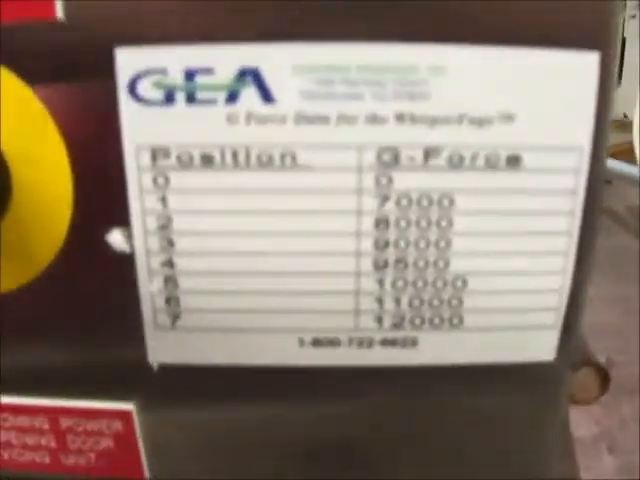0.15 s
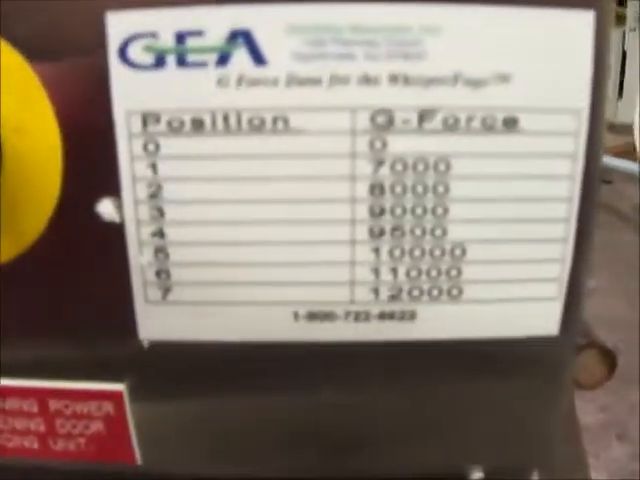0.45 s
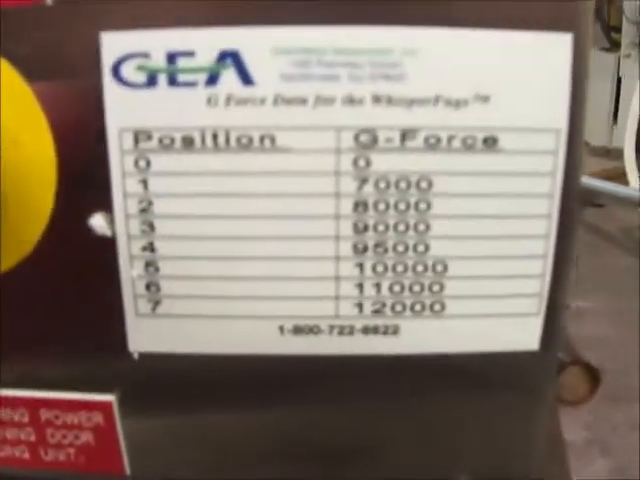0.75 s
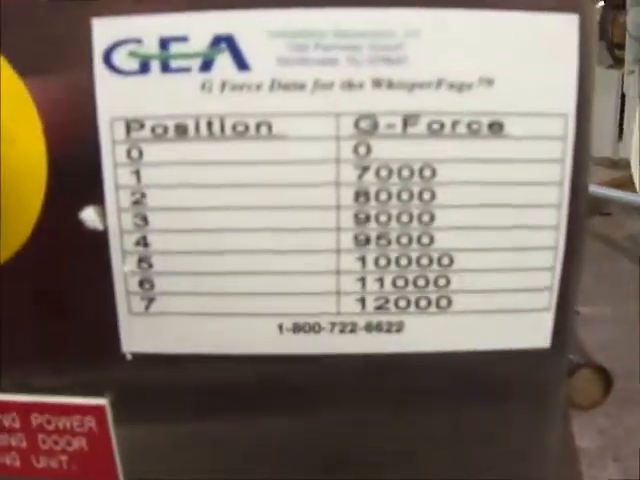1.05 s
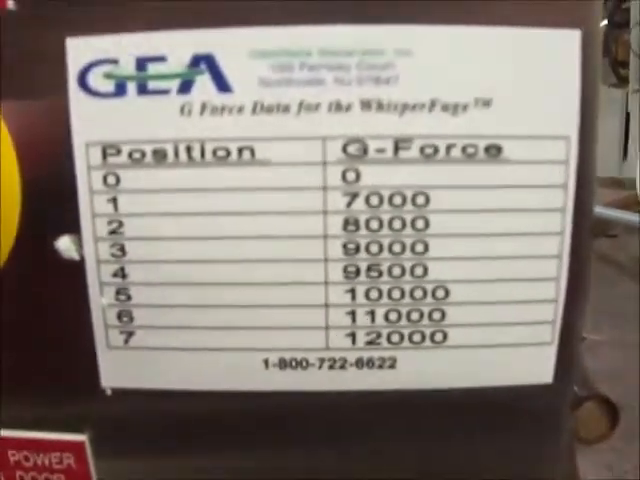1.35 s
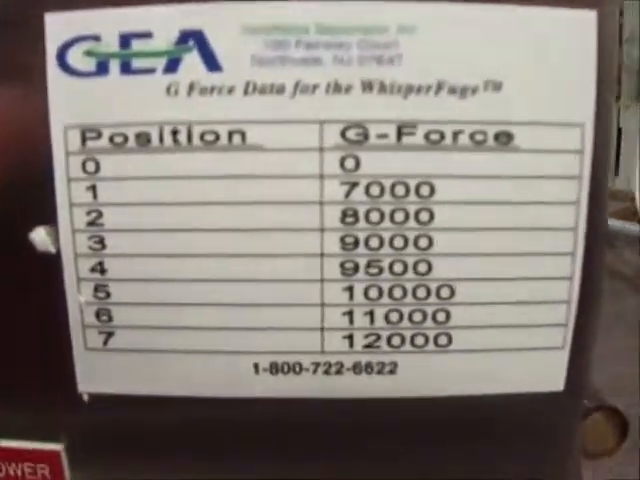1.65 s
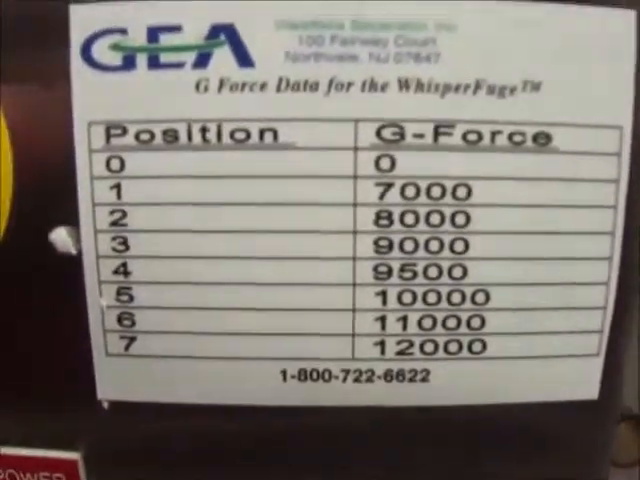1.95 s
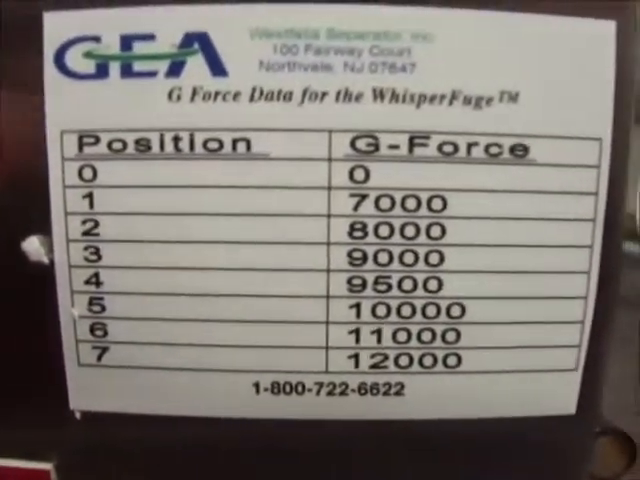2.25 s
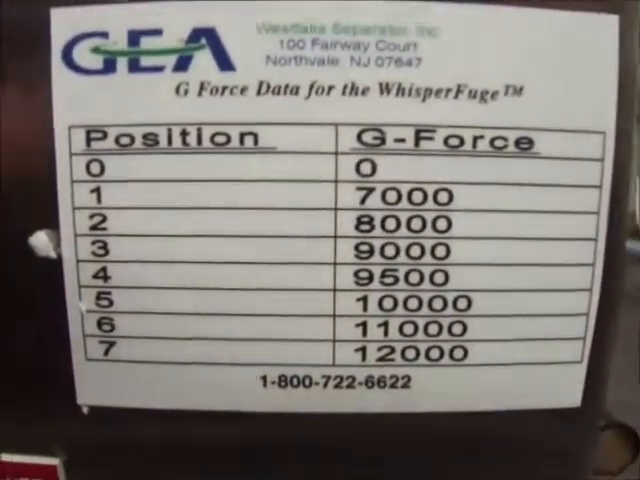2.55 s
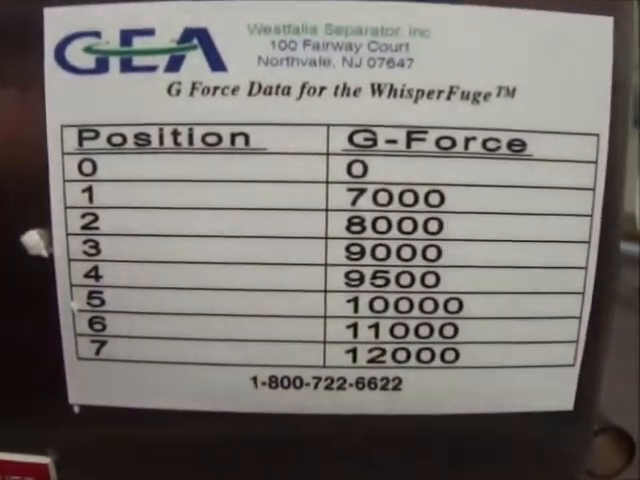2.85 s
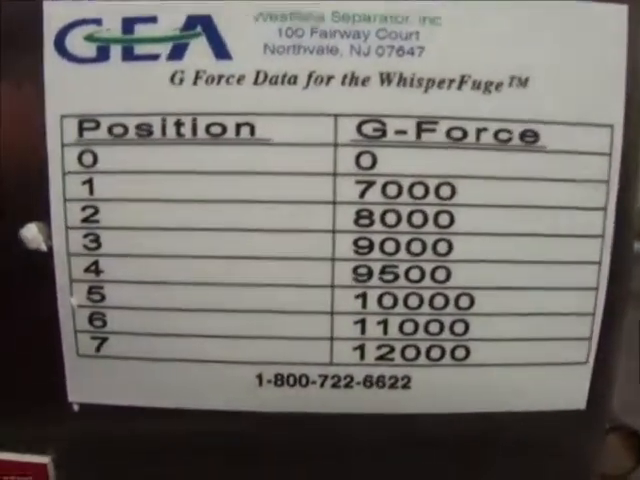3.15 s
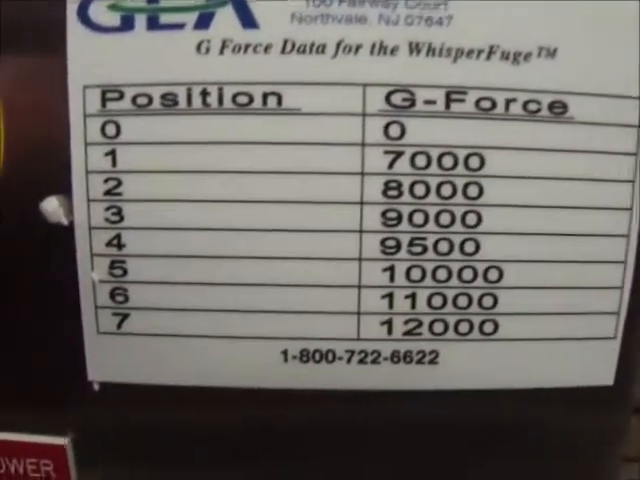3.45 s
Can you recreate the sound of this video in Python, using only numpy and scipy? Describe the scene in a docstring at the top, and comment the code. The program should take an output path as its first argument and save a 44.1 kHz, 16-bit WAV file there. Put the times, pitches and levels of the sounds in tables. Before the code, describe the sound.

Steady hum and hissing roar of an industrial centrifuge up close, with brief dull rattles.

```python
"""An industrial centrifuge runs at full speed in a factory hall, heard close to its control panel.
From the start the bowl hums at its rotation rate and the harmonics, amid drive tones and bearing whines;
churned air and liquid roar and hiss, throbbing 15 times a second, and strong throbs rattle the housing.
Brief steel rings colour the first 1.5 s, then a low drone swells. Rattles thin out after 2 s, a last
ring comes at 3 s, and the hum grows slightly as the microphone ends nearest the panel."""
import sys
import numpy as np
from scipy import signal
from scipy.fft import rfft, irfft
from scipy.io import wavfile

SR = 44100
rng = np.random.default_rng(int(sys.argv[2]) if len(sys.argv) > 2 else 0)


def file_out(sig):
    """Save sig as 16-bit WAV at sys.argv[1]."""
    # one column per channel
    cols = np.atleast_2d(sig).T
    # limit, then scale
    lim = np.clip(cols, -1, 1)
    pcm = np.round(lim * 32767).astype(np.int16)
    wavfile.write(sys.argv[1], SR, pcm)


N = 158760
t = np.arange(N) / SR


def undb(db):
    """Amplitude ratio of a level in decibels."""
    return 10 ** (np.asarray(db) / 20)


def filtered(x, gain):
    """Linear filtering: the spectrum is multiplied by gain(f)."""
    f = np.maximum(np.arange(N // 2 + 1) * SR / N, 1e-3)
    return irfft(rfft(x) * gain(f), N)


def fluctuation(rate_hz):
    """Low-pass Gaussian noise of zero mean and unit variance."""
    slow = filtered(rng.standard_normal(N), lambda f: 1 / (1 + (f / rate_hz) ** 4))
    return (slow - slow.mean()) / slow.std()


def tone(hz, db, waver, rate_hz):
    """Random amplitude and phase modulation of a sinusoid, at a given RMS level."""
    carrier = np.exp(2j * np.pi * (hz * t + rng.random()))
    sway = 1 + waver * (fluctuation(rate_hz) + 1j * fluctuation(rate_hz)) / np.sqrt(2)
    return undb(db) * np.sqrt(2 / (1 + waver ** 2)) * (sway * carrier).real


def resonance(hz, half_width_hz):
    """Response of one mode to random forcing, at unit RMS."""
    mode = filtered(rng.standard_normal(N), lambda f: 1 / (1 + ((f - hz) / half_width_hz) ** 2))
    return mode / mode.std()


# Envelope of the drone: t/s, level/dB
DRONE_LEVELS = [(0, -61), (.5, -57), (1, -74), (1.45, -49), (1.75, -49), (2.1, -59), (2.5, -52),
                (2.85, -64), (3.6, -54)]

def drone():
    """Slow amplitude modulation: a low tone of the drive comes and goes."""
    return tone(hz=83, db=0, waver=0.12, rate_hz=4) * undb(np.interp(t, *np.array(DRONE_LEVELS).T))


# Swells of metallic ringing: t/s, half-duration/s, f/Hz, half-width/Hz, level/dB
RING_SWELLS = [(.06, .12, 4030, 40, -35.5), (0.273, 0.081, 3890, 25, -35), (.70, 0.14, 2790, 80, -37),
               (.90, .11, 2800, 55, -37), (1.35, 0.22, 4055, 30, -39), (3.0, .09, 2870, 80, -39)]

def steel_ringing():
    """Lightly damped resonance: narrow, high modes of the steel swell and fade."""
    return sum(undb(db) * np.exp(-((t - at) / half_s) ** 2) * resonance(hz, width)
               for at, half_s, hz, width, db in RING_SWELLS)


# Whines of bearings and motor: f/Hz, relative level/dB
WHINE_LINES = [(1950, -45), (2927, -48), (3033, -44.5), (3095, -48), (3247, -51), (3492, -50), (3643, -49),
               (3708, -48.5), (3771, -47), (3886, -43), (4037, -45), (4059, -44), (4437, -50), (4588, -50),
               (6997, -48), (7095, -54), (7884, -53)]

def bearing_whine(gain_db=1):
    """Narrow-band fading: thin, high spectral lines waver independently in the hall."""
    return sum(tone(hz, db + gain_db, waver=0.4, rate_hz=3.1) for hz, db in WHINE_LINES)


# Modes of the housing: f/Hz, half-width/Hz, relative level/dB
HOUSING_MODES = [(464, 47, -9.5), (703, 44, -4.5), (870, 63, -0.5), (1016, 42, -11.5), (1320, 300, -6.5)]
# Strong throbs: t/s, relative level/dB
STRONG_THROBS = [(.078, -23), (.130, -19), (.194, -18), (.328, -24), (.392, -30), (.529, -21),
                 (.594, -24.5), (.864, -26), (.930, -21), (1.163, -24), (1.262, -34), (1.332, -19.5),
                 (1.594, -29), (1.731, -20), (1.922, -29), (2.532, -23), (2.832, -20), (2.932, -20),
                 (3.402, -27), (3.468, -19)]

def housing_rattle(gain_db=-3.5, rise_s=0.016, fall_s=0.015):
    """Forced vibration: each strong throb briefly excites the housing's modes in a dull rattle."""
    modes = sum(undb(db) * resonance(hz, width) for hz, width, db in HOUSING_MODES)
    force = sum(undb(db) * np.exp(-((t - at) / np.where(t < at, rise_s, fall_s)) ** 2)
                for at, db in STRONG_THROBS)
    return undb(gain_db) * force * modes / modes.std()


# Tones of drive and housing: f/Hz, level/dB
DRIVE_LINES = [(124, -59), (246, -47.5), (284, -51.5), (315, -52), (429, -47), (480, -42), (569, -46),
               (629, -49), (659, -51), (692, -41.5), (829, -44), (838, -43.5), (868, -45), (1030, -47),
               (1227, -48), (1241, -46.5), (1288, -47.5), (1327, -45.5), (1428, -48), (1439, -41),
               (1497, -48), (1607, -46.5), (1616, -40.5), (1637, -48.5), (1647, -47.5), (1672, -47)]

def drive_tones():
    """Beating: weak, wavering tones interfere where their frequencies lie close together."""
    return sum(tone(hz, db, waver=0.73, rate_hz=4) for hz, db in DRIVE_LINES)


# Roar and hiss, with the housing's broad resonances: f/Hz, spectral density level/dB
FLOW_SPECTRUM = [(25, -102), (60, -76), (100, -77.5), (155, -59.5), (200, -63), (330, -59.5), (455, -53.5),
                 (545, -60), (700, -55.5), (775, -55.5), (850, -51.5), (940, -60.5), (1030, -53),
                 (1100, -60), (1300, -54.5), (1550, -58.5), (1630, -59.5), (1760, -57.5), (1970, -58),
                 (2320, -62.5), (2800, -58.5), (3150, -63.5), (3400, -61.5), (4200, -63), (4900, -63.5),
                 (5900, -67.5), (9000, -69), (10200, -68), (11000, -69.5)]

def turbulence(body_gain, hiss_gain, throb_hz=14.97, shaft_hz=29.8):
    """Turbulent flow radiates broadband noise, coloured by the housing and modulated by rotation."""
    hz, db = np.array(FLOW_SPECTRUM).T
    white = rng.standard_normal(N) * np.sqrt(SR / 2)  # unit power per hertz
    noise = filtered(white, lambda f: undb(np.interp(np.log(f), np.log(hz), db)))
    body, up_to_churn, up_to_rush = (filtered(noise, lambda f: 1 / (1 + (f / edge_hz) ** 8))
                                     for edge_hz in (623, 2140, 5500))
    throb = 1 + 0.088 * np.cos(2 * np.pi * throb_hz * (t - 0.123))  # about half the shaft rate
    surge = undb(-2 + 0.35 * fluctuation(rate_hz=26))
    churn = (up_to_churn - body) * throb * surge
    rush = up_to_rush - up_to_churn
    hiss = (noise - up_to_rush) * undb(0.5) * hiss_gain
    shake = 1 + 0.047 * np.sin(2 * np.pi * (shaft_hz * t + rng.random()))  # once per motor shaft turn
    flicker = undb(0.36 * fluctuation(rate_hz=35))
    return body * body_gain + (churn + rush + hiss) * shake * flicker


# Harmonics of the bowl: order, level/dB, flutter depth
BOWL_HARMONICS = [(1, -29.5, 0.033), (2, -24.5, 0.024), (3, -36, 0.24), (4, -26.5, 0.11), (5, -38, 0.38),
                  (6, -39.5, 0.22), (7, -40, 0.37), (8, -36, 0.62), (9, -41, .3)]

def bowl_hum(rotation_hz=199.92):
    """Rotating unbalance: a periodic force gives exact harmonics, the upper ones fluttering most."""
    return sum(tone(order * rotation_hz, db, flutter, rate_hz=21.8)
               for order, db, flutter in BOWL_HARMONICS)


# Path of the microphone: t/s, distance from the panel/m
MICROPHONE_PATH = [(0, 0.26), (.3, 0.24), (.9, .26), (1.5, 0.2), (2.1, 0.24), (2.9, 0.22), (3.6, 0.16)]

def scene(hum_db_per_m=16, screening_db_per_m=9):
    """Superposition at one microphone: nearer the panel the hum grows and the hiss is screened."""
    distance_m = np.interp(t, *np.array(MICROPHONE_PATH).T)
    nearer_m = distance_m.mean() - distance_m
    near_gain = undb(hum_db_per_m * nearer_m)
    hiss_gain = undb(-screening_db_per_m * nearer_m)
    hum = (bowl_hum() + drive_tones()) * near_gain + drone()
    mono = hum + bearing_whine() + steel_ringing() + housing_rattle() + turbulence(near_gain, hiss_gain)
    return np.array([mono, mono])


def record(dry, cutoff_hz=11020):
    """Band limiting: a steep low-pass filter removes the top of the treble."""
    taps = signal.firwin(1501, cutoff_hz, fs=SR, window="blackman")
    return signal.fftconvolve(dry, taps[None], mode="same", axes=1)


dry = scene()
out = record(dry)
file_out(out)
```